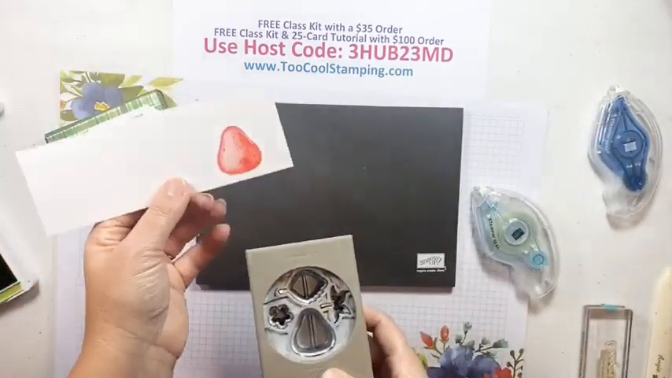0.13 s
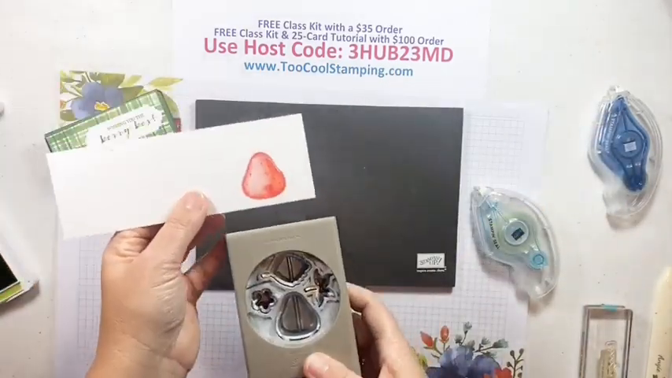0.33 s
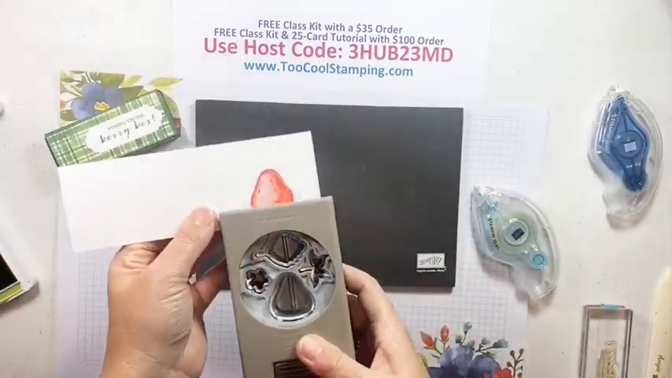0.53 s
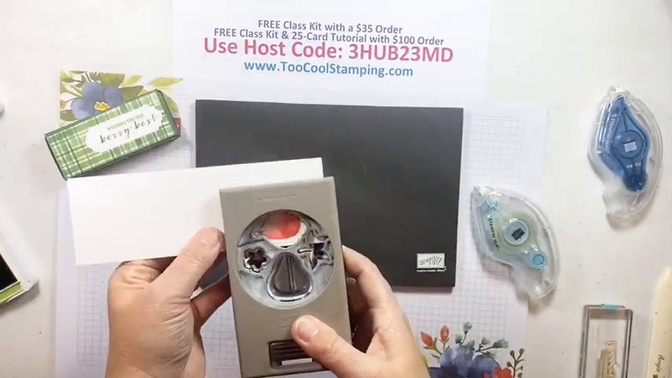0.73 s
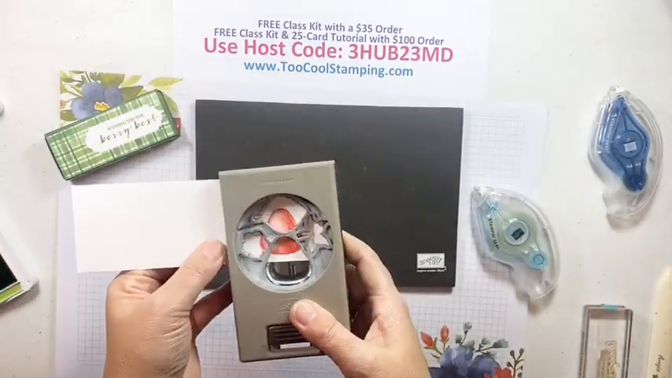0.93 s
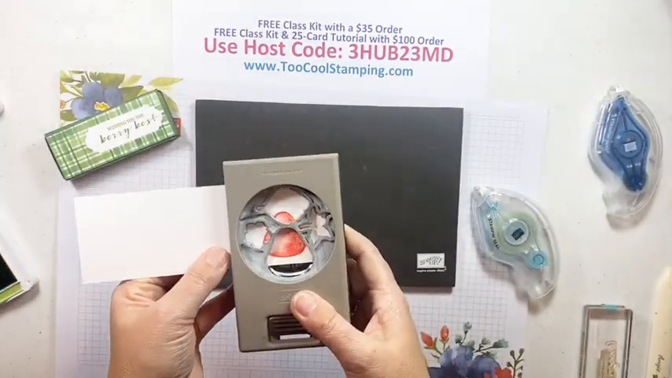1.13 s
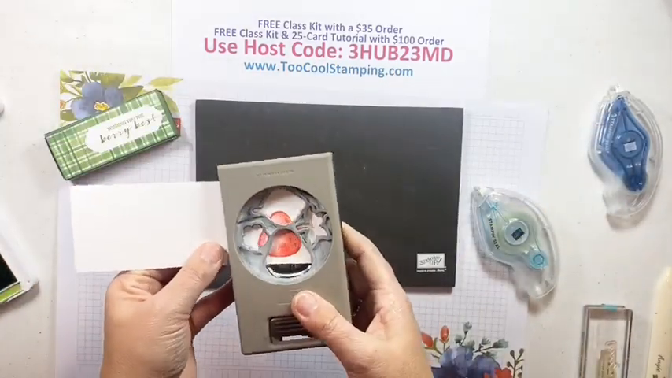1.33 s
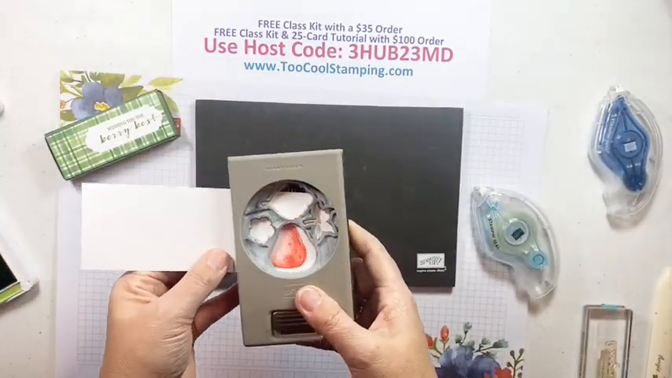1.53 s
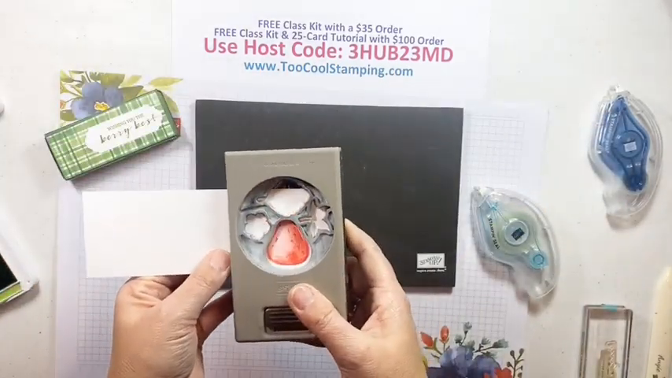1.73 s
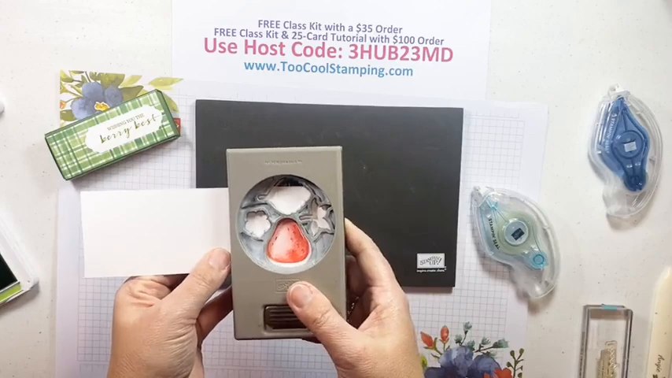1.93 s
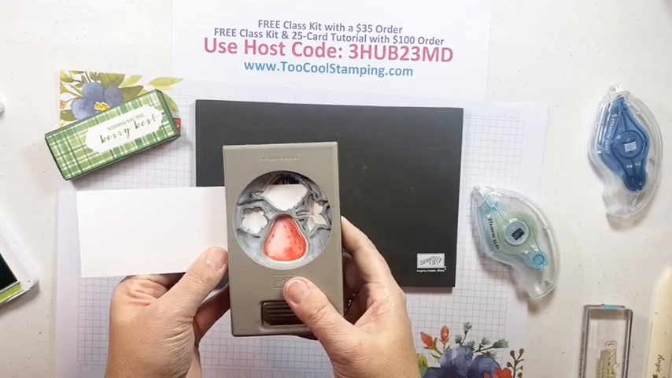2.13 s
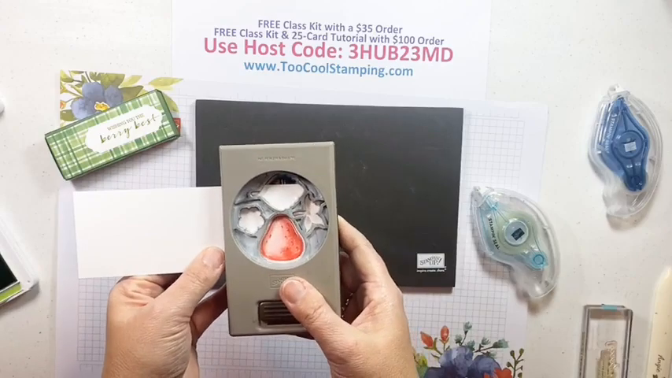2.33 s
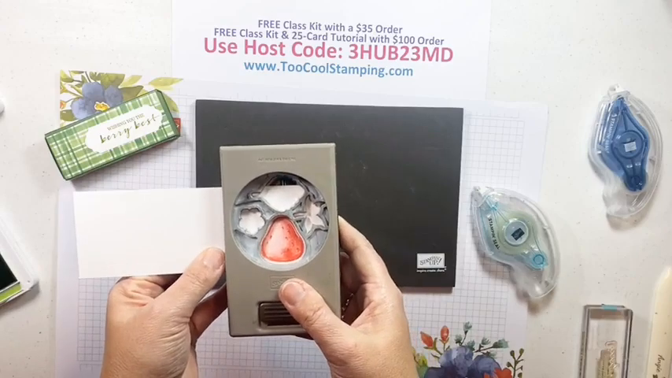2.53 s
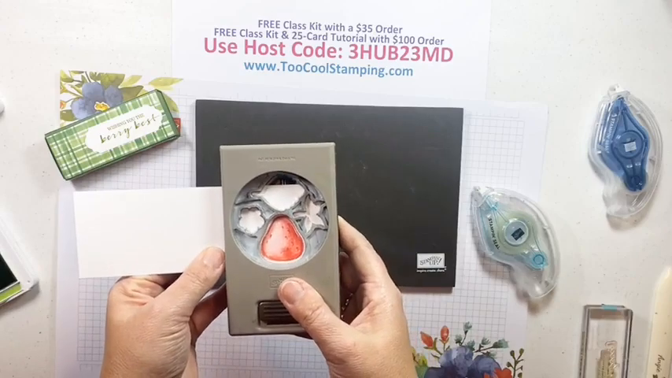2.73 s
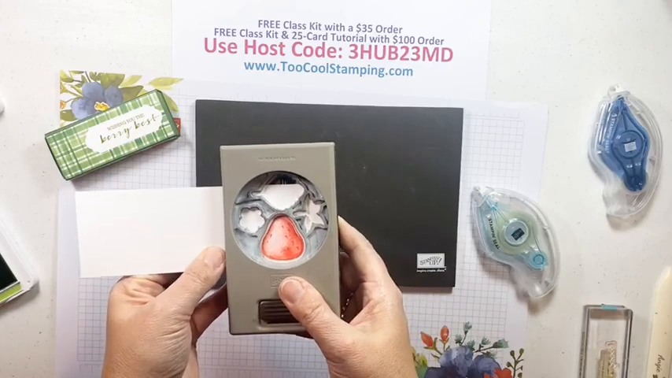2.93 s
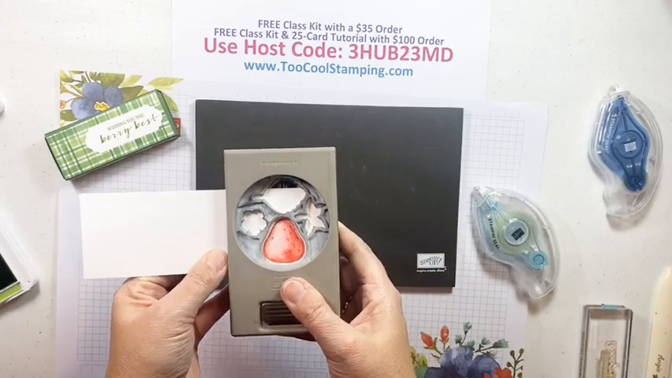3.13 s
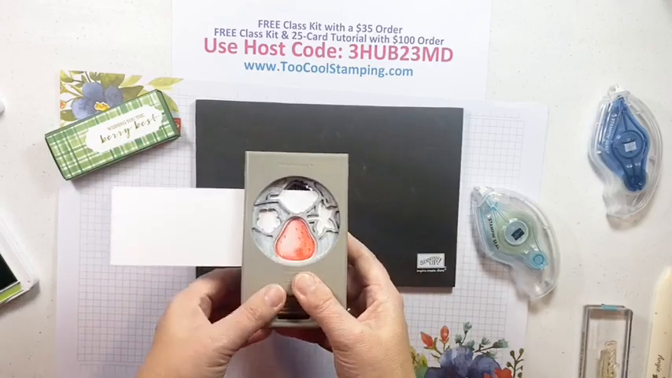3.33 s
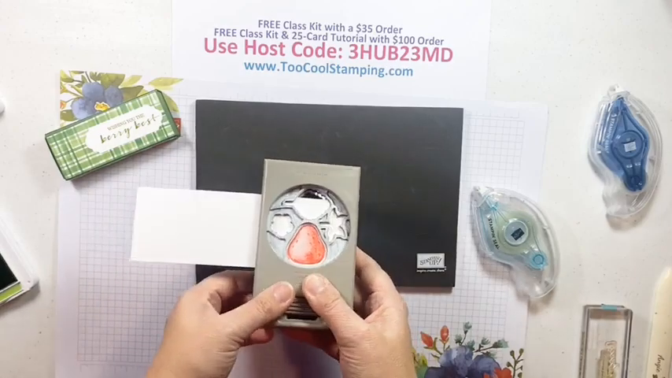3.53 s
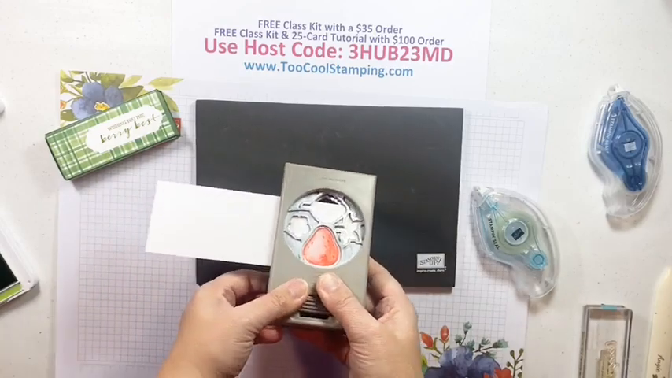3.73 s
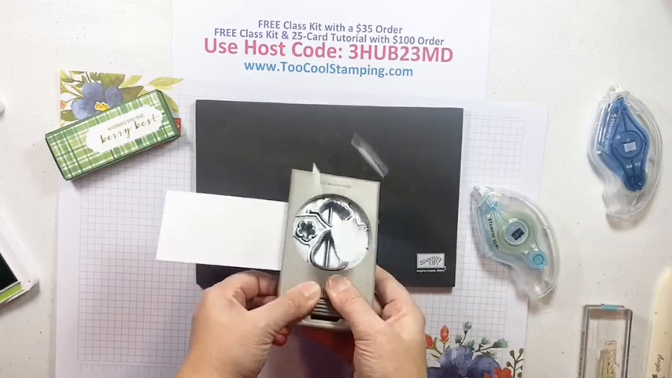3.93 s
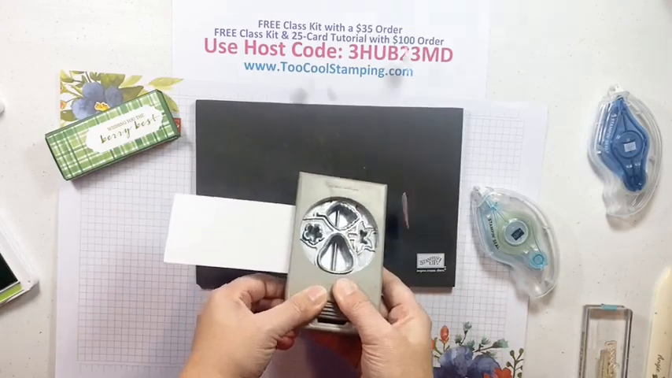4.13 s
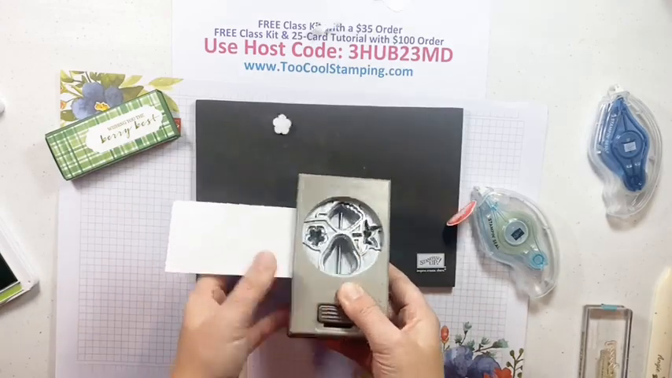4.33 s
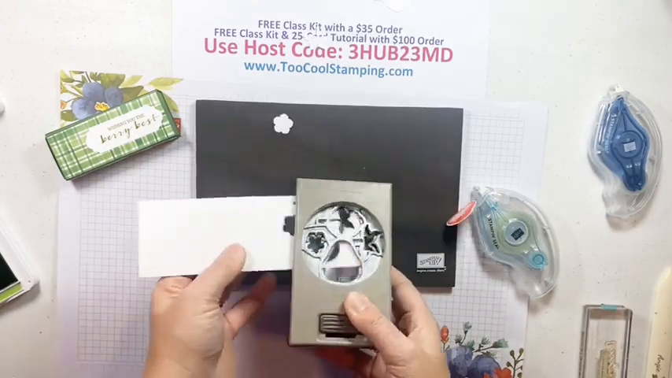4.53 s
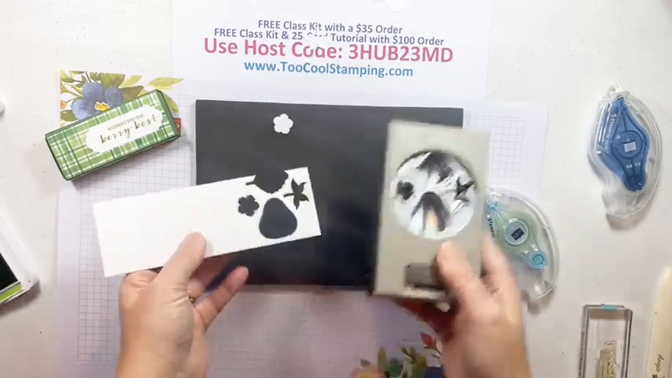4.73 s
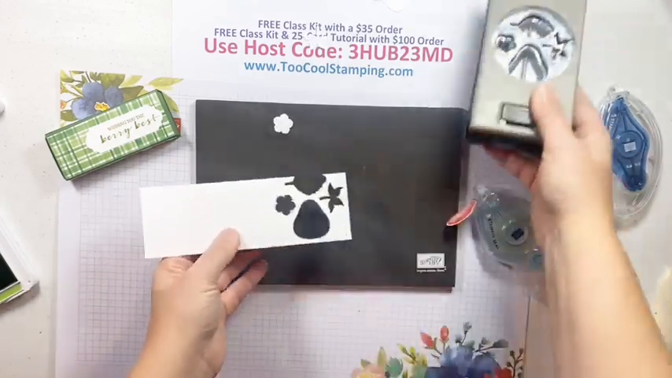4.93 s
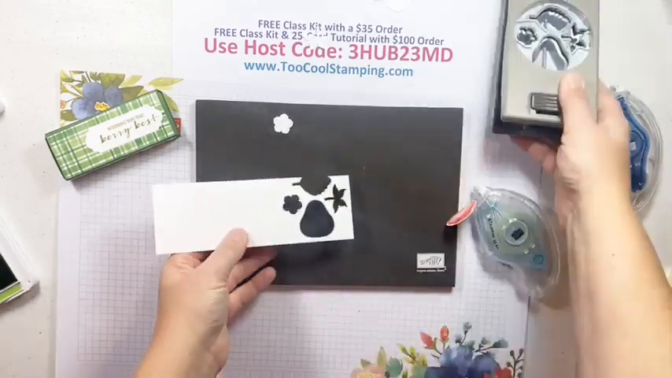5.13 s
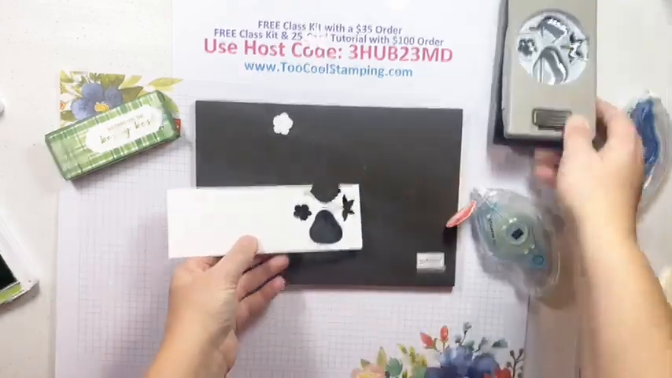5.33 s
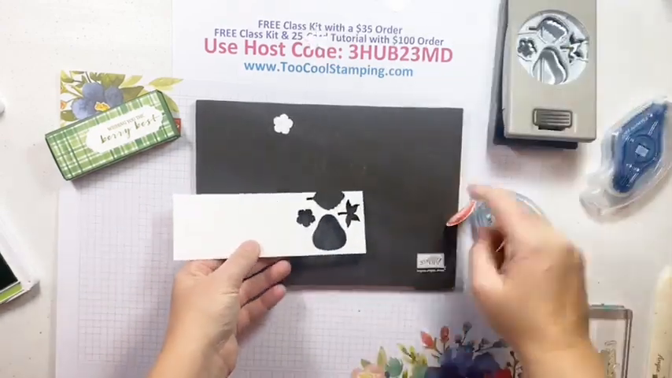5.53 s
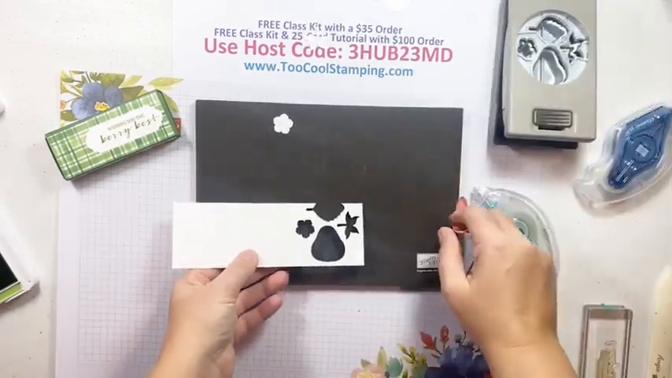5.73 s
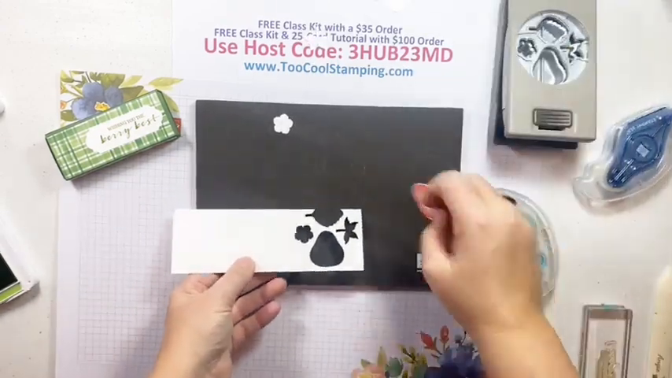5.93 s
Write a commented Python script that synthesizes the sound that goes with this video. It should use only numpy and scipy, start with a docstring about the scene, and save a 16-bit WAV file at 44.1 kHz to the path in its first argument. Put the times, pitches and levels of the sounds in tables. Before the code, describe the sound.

Card rustles faintly into a lever punch, which clacks through it, twangs and bumps down onto a table in a quiet room.

```python
"""At a craft table in a small room, a strip of card rubs its way into a hand-held lever punch.
The lever is squeezed: the steel cutters crunch through the card in stages and snap home, the frame
rings, and a twanging spring lifts them again. The card is drawn out, the punch lands on the table
in two bumps, rattling and skidding, and a fingertip drags a cut piece over the mat to pick it up.
One microphone overhead hears it all, along with the soft noise of the room's air."""
import sys
import numpy as np
from scipy import signal
from scipy.fft import rfft, irfft
from scipy.io import wavfile

SR = 44100
rng = np.random.default_rng(int(sys.argv[2]) if len(sys.argv) > 2 else 0)


def pcm_store(signal):
    """Save signal as 16-bit PCM."""
    levels = np.round(np.clip(np.atleast_2d(signal), -1, 1) * 32767)
    wavfile.write(sys.argv[1], SR, levels.astype(np.int16).T)


N = 267907
TIME = np.arange(N) / SR


def from_db(db):
    """Turn decibels into a number to multiply by."""
    return 10 ** (np.asarray(db) / 20)


def rms_one(x):
    """Scale a sound so that its average size (rms) is 1."""
    return x / np.sqrt(np.mean(x ** 2) + 1e-20)


def at_hz(points, hz):
    """Read between the rows of a table, giving every octave equal room."""
    f, value = np.transpose(points)
    return np.interp(np.log(np.maximum(hz, 1)), np.log(f), value)


def add(out, s, sound):
    """Mix a sound in, starting at s seconds."""
    start = int(s * SR)
    out[start:start + len(sound)] += sound[:len(out) - start]


def colour(x, tone):
    """Make each frequency louder or softer, following a tone table."""
    size = 8192
    gains = from_db(at_hz(tone, np.fft.rfftfreq(size, 1 / SR)))
    cepstrum = irfft(np.log(gains))
    cepstrum[1:size // 2] *= 2   # folded in half, so the filter never answers before the sound arrives
    cepstrum[size // 2 + 1:] = 0
    response = irfft(np.exp(rfft(cepstrum)))
    return signal.fftconvolve(x, response)[:len(x)]


def resonate(force, notes):
    """A shaken object rings at its own notes; the narrower a note's width, the longer it lasts."""
    out = np.zeros(len(force))
    for k, (hz, width, db) in enumerate(notes):
        r = np.exp(-np.pi * width / SR)   # how much ring is left after one sample
        angle = 2 * np.pi * hz / SR
        ring = signal.lfilter([1, 0, -1], [1, -2 * r * np.cos(angle), r * r], force + 1e-18)
        out += (-1) ** k * from_db(db) * (1 - r * r) / 2 * ring   # every other note is flipped
    return out


def burst(swell_s):
    """A short crackle that swells for swell_s seconds and dies, about equally strong at all pitches."""
    size = 4096
    age = np.arange(size) / SR / max(swell_s, 1 / SR)
    swell = (age * np.exp(1 - age)) ** 2
    noise = rng.standard_normal(size) * swell
    even_spectrum = np.exp(1j * np.angle(rfft(noise)))
    crackle = irfft(even_spectrum) * np.sqrt(swell)
    return crackle / np.linalg.norm(crackle)


def strike(hits, notes):
    """Sharp hits leave a part ringing."""
    s, db = np.transpose(hits)
    force = np.zeros(N)
    force[(s * SR).astype(int)] = from_db(db)
    return resonate(force, notes)


def pushes(starts, lengths, levels_db):
    """Each soft, heavy contact is one smooth pulse of force."""
    force = np.zeros(N)
    for s, length, db in zip(starts, lengths, levels_db):
        age = np.maximum(TIME - s, 0) * 4 / length
        pulse = age * np.exp(-age)
        force += from_db(db) * pulse / pulse.sum()
    return force


def friction(slips_per_s, spread_db):
    """Fibres catch and let go, making many tiny slips of uneven size."""
    sizes = from_db(spread_db * np.minimum(rng.exponential(1, N), 4))
    slipping = rng.random(N) < slips_per_s / SR
    return slipping * sizes * rng.standard_normal(N)


def strokes(starts, lengths, levels_db, rise_s=0.01, fade_s=0.032):
    """The loudness of sliding strokes: each one swells, holds and dies away."""
    power = np.zeros(N)
    age = TIME[:SR]
    rise = 1 - np.exp(-(age / rise_s) ** 2)
    for s, length, db in zip(starts, lengths, levels_db):
        fade = np.exp(-np.maximum(age - length, 0) / fade_s)
        add(power, s, (from_db(db) * rise * fade) ** 2)
    return np.sqrt(power)


def rub(slides, tone, slips_per_s):
    """One smooth surface slides over another and hisses."""
    slips = friction(slips_per_s, spread_db=1.5)
    return strokes(*np.transpose(slides)) * rms_one(colour(slips, tone))


# tone of the room's air: f/Hz, level/dB
AIR_TONE = [(15, -33), (25, -21), (49, -3.5), (87, -5), (166, -6), (212, -8), (301, -7), (405, -9.5),
            (1190, -18), (1290, -20.5), (1740, -21), (2110, -23.5), (2480, -23), (7710, -28),
            (16000, -44.5)]

def room_air():
    """The air in the room makes a faint, low, steady noise."""
    noise = colour(rng.standard_normal(N + SR), AIR_TONE)[SR:]
    return from_db(-67) * rms_one(noise)


# pushes that feed the card in: t/s, length/s, slot level/dB, rubbing level/dB
CARD_PUSHES = [(0.288, 0.031, -79, -80), (0.716, .09, -76, -78.5), (0.797, 0.094, -68.5, -58),
               (0.921, 0.16, -69, -67.5), (1.042, 0.028, -64.5, -84), (1.112, 0.047, -57, -82),
               (1.171, 0.042, -63, -79), (1.435, 0.034, -65.5, -81), (1.551, 0.095, -66, -79),
               (1.713, .12, -73.5, -85), (2.3, 0.024, -75, -81), (2.485, 0.039, -79, -89)]
# notes of the slot: f/Hz, width/Hz, level/dB
SLOT_NOTES = [(1397, 330, 10.5), (1470, 275, 10.5), (1595, 59, 10), (1630, 160, 5.5), (2820, 1060, -8)]
# tone of the rubbing card: f/Hz, level/dB
CARD_TONE = [(300, -16.5), (800, -4), (1500, -22), (1850, 1), (2000, 3), (2200, -4), (3200, -4.5),
             (3900, 1.5), (4400, 3.5), (5000, -6.5), (8000, -7), (10500, -24), (16000, -25)]

def feed_card():
    """The card rubs along the cutters and sets the narrow slot ringing."""
    s, length, slot_db, rub_db = np.transpose(CARD_PUSHES)
    slips = friction(slips_per_s=5000, spread_db=1.0)
    slot = strokes(s, length, slot_db) * rms_one(resonate(slips, SLOT_NOTES))
    rubbing = strokes(s, length, rub_db) * rms_one(colour(slips, CARD_TONE))
    return slot + rubbing


# clacks of the punch and the quick echoes that follow the loud ones:
# t/s, swell time/s, strength/dB, hardness/dB, casing boost/dB, cutter boost/dB
CLACKS_AND_ECHOES = [(1.616, 0.0012, -19.5, 2, 11, 0), (3.319, 0.0061, -27.5, -13.5, -3, 3.5),
                     (3.514, 0.0018, -29, -9, 9.5, -2), (3.596, 0.0019, -9, -1, 6, -3),
                     (3.6055, 0.00095, -4.5, -6.5, 7, -3), (3.632, 0.0035, -8, -0.5, 8, 0.5),
                     (3.676, .0014, -11, 1.5, 0, 5.5), (3.6845, 0.0014, -10.5, 1, 6.5, 5.5),
                     (3.824, 0.0072, -22.5, -1, 9.5, 0), (3.933, 0.0015, -4, -2.5, 9, 10),
                     (3.9412, 0.0015, -4.5, -3.5, 14, 6), (4.0405, 0.0018, 7.5, 5, -1, 3),
                     (4.049, 0.0089, 0, 5, -4.5, 6), (4.090, 0.0019, 9.5, 1.5, -2, -2.5),
                     (4.097, 0.0049, 4.5, 2, -2, 1), (4.298, 0.0076, -15.5, 8, -2, 2),
                     (4.335, 0.018, -12, 0, 2, 0), (4.433, 0.004, -22, 17, 6, -2),
                     (4.583, .011, -18.5, -8.5, -1, -5)]
# dull thud of the whole tool in the hands: f/Hz, width/Hz, level/dB
THUD_NOTES = [(149.5, 58, -3), (274, 42, -1), (385, 61, 1.5), (565, 79, 1)]
# notes of the hollow under the lever: f/Hz, width/Hz, level/dB
HOLLOW_NOTES = [(675, 62, -2), (732, 54, 0.5), (820, 53, 2), (1066, 134, 3.5)]
# bright crack of the card: f/Hz, width/Hz, level/dB
CRACK_NOTES = [(4465, 1600, -12), (6705, 810, 2), (7010, 600, 4), (8170, 1010, -1), (9000, 920, -2.5),
               (11500, 2100, -12.5), (14400, 2000, -17)]
# notes of the casing: f/Hz, width/Hz, level/dB
CASING_NOTES = [(1157, 69, -3.5), (1226, 82, 1.5), (1373, 124, 7), (1410, 154, 5.5), (1640, 83, -7),
                (1806, 190, -18.5), (2298, 186, -8)]
# notes of the steel cutters: f/Hz, width/Hz, level/dB
CUTTER_NOTES = [(2026, 190, -4.5), (2295, 91, -1), (2715, 206, -6), (3010, 51, -0.5), (3250, 584, -5),
                (4140, 190, -5.5), (4280, 160, -7), (4806, 100, -2.5), (5060, 400, -12)]

def punch_clacks(break_through_s=4.0):
    """The punch's parts ring: hard clacks crack, soft ones thud, and quick echoes follow loud ones."""
    out = np.zeros(N)
    for s, swell_s, strength_db, hardness_db, casing_db, cutter_db in CLACKS_AND_ECHOES:
        force = from_db(strength_db) * np.pad(burst(swell_s), (0, SR // 2))
        thud = from_db(-4.5 - 0.95 * hardness_db) * resonate(force, THUD_NOTES)
        hollow = from_db(0.28 - 0.1 * hardness_db) * resonate(force, HOLLOW_NOTES)
        crack = from_db(-7 + 0.96 * hardness_db) * resonate(force, CRACK_NOTES)
        casing = from_db(2.5 + casing_db) * resonate(force, CASING_NOTES)
        cutters = from_db(3 + 0.55 * hardness_db + cutter_db) * resonate(force, CUTTER_NOTES)
        clack = thud + hollow + crack + casing + cutters
        # the card closes the punch; once it is cut through, more sound fills the room
        tail_db = -34.5 if s < break_through_s else -29.5
        add(out, s, room(clack, tail_db))   # the tool shifts in the hands, so the room's answer varies
    return out


# the cutters snap home: t/s, level/dB
SNAPS = [(4.043, 15), (4.094, 17)]
# notes of the metal frame: f/Hz, width/Hz, level/dB
FRAME_NOTES = [(786, 12.36, -5.5), (1016, 18, 3.5), (1106, 37, 3.5), (1300, 7.9, -7), (1427, 19, -3),
               (1829, 21.8, 7), (2040, 12, -4.5), (2180, 8.8, -3.5), (2330, 8.6, -0.5), (2670, 16, 1.5),
               (2840, 30, 1.5), (2960, 22, 0.5), (3170, 22, -1.5), (3270, 24, -2), (5170, 11, -5.5),
               (5552, 11, -6.5)]

def snap_home():
    """The cutters snap home and the metal frame rings on."""
    return strike(SNAPS, FRAME_NOTES)


# twangs of the spring: t/s, level/dB
TWANGS = [(4.304, -5.5), (4.348, 0), (4.437, -5.5)]
# notes of the spring: f/Hz, width/Hz, level/dB
SPRING_NOTES = [(278.6, 6.3, 6.5), (575, 7, 5), (1060, 31, -5)]

def spring_twang():
    """The spring twangs as it lifts the cutters again."""
    return strike(TWANGS, SPRING_NOTES)


# tugs on the card: t/s, length/s, level/dB
TUGS = [(4.44, 0.069, -60), (4.525, 0.077, -63), (4.67, 0.063, -63), (4.78, 0.02, -63)]
# tone of the tugs: f/Hz, level/dB
TUG_TONE = [(180, -42), (300, -1), (392, 3), (447, -21), (565, -5), (1060, -2.5), (1150, -6), (1250, -1),
            (3460, -6.5), (7320, -8), (16000, -20)]

def draw_card_out():
    """The card rubs against the punch as it is tugged out."""
    return rub(TUGS, TUG_TONE, slips_per_s=4700)


# the punch meets the table: t/s, contact time/s, thump level/dB, drone level/dB, rattle level/dB
BUMPS = [(5.2119, 0.0017, 3, -8, -8.5), (5.217, 0.0037, 22, 19.5, -0.5), (5.230, 0.0079, 14, 23, -11.5),
         (5.442, 0.004, 29.5, 4, -2.5), (5.450, 0.0049, 35, 33, 3), (5.470, 0.0036, 8, 40.5, 3.5),
         (5.496, 0.007, 26.5, 34, -3)]
# the table top's short thump: f/Hz, width/Hz, level/dB
THUMP_NOTES = [(59, 5.6, 1.5), (96.4, 6.8, 8.5), (143.6, 16, 5), (192, 21, 1.5), (295, 39, -1.5),
               (389, 76, -7.5), (620, 250, -18)]
# the table top's lingering drone: f/Hz, width/Hz, level/dB
DRONE_NOTES = [(81, 6.8, 0), (117.3, 5.14, 3.5), (178.7, 6.9, 0), (230, 4.5, -4.5), (283.3, 6.9, 8.5),
               (398.3, 8.7, -3), (563, 6.8, 7)]
# tone of the punch's loose parts: f/Hz, level/dB
RATTLE_TONE = [(60, -31.5), (150, 11.5), (400, 5.5), (600, 1), (1150, -2), (1800, -7), (2500, -4),
               (3300, -12.5), (5000, -16), (8000, -27.5), (10000, -30.5), (12000, -52), (16000, -50)]

def set_down():
    """The table top thumps and drones under the weight while the punch's loose parts rattle."""
    starts, lengths, thump_db, drone_db, rattle_db = np.transpose(BUMPS)
    thump = resonate(pushes(starts, lengths, thump_db), THUMP_NOTES)
    drone = resonate(pushes(starts, lengths, drone_db), DRONE_NOTES)
    rattle = np.zeros(N)
    for s, swell_s, db in zip(starts, lengths, rattle_db):
        force = from_db(db) * np.pad(burst(swell_s), (0, SR // 2))
        add(rattle, s, room(colour(force, RATTLE_TONE), tail_db=-29.5))
    return thump + drone + rattle


# skids of the punch: t/s, length/s, level/dB
SKIDS = [(5.355, 0.064, -56), (5.44, 0.077, -45), (5.56, 0.382, -70)]
# tone of the skids: f/Hz, level/dB
SKID_TONE = [(300, 6.5), (700, -6), (1100, -3), (1800, -9), (2500, -10.5), (3300, -13.5), (6000, -23.5),
             (14000, -37)]

def punch_skid():
    """The punch scrapes over the table top as it settles."""
    return rub(SKIDS, SKID_TONE, slips_per_s=3000)


# drags of the cut piece: t/s, length/s, level/dB
DRAGS = [(6.002, 0.061, -55.5), (6.048, .04, -54)]
# tone of the drags: f/Hz, level/dB
DRAG_TONE = [(1000, -20.5), (2550, -25), (3000, -12.5), (3400, -25), (4350, -6.5), (4700, -17), (5200, -3),
             (6100, -17.5), (7500, -19), (9500, -23), (13000, -39), (16000, -44)]

def pick_up_piece():
    """A fingertip drags a cut piece of card over the mat."""
    return rub(DRAGS, DRAG_TONE, slips_per_s=4000)


# bounces between the table and a nearby surface: delay/s, gain
ECHOES = [(.0074, 0.66), (0.0168, .42)]
# the room's fading tail of sound: f/Hz, fade time/s (to fall 60 dB), level/dB
ROOM_TAIL = [(70, 0.86, -1.5), (304, 0.35, -1), (900, 0.34, 2), (1490, 0.34, 0.5), (2980, 0.3, 3.5),
             (7300, 0.24, 4), (14000, 0.18, 3)]

def room(x, tail_db, scatter_s=0.00066, build_s=0.0026):
    """Sound arrives directly, then as slightly smeared echoes and a tail whose highs die first."""
    size = 24576
    t, hz = TIME[:size], np.fft.rfftfreq(size, 1 / SR)
    centres, fade_times, levels_db = np.transpose(ROOM_TAIL)
    noise_spectrum = rfft(rng.standard_normal(size))
    response = np.zeros(size)
    for fade_s, db, share in zip(fade_times, levels_db, np.eye(len(ROOM_TAIL))):
        band = irfft(noise_spectrum * at_hz(np.c_[centres, share], hz))
        response += band * from_db(tail_db + db) * np.exp(-np.log(1000) * t / fade_s)
    response *= 1 - np.exp(-(t / build_s) ** 2)
    response[0] += 1   # the direct sound
    for delay, gain in ECHOES:
        add(response, delay, gain * burst(scatter_s))
    return signal.fftconvolve(x, response)[:len(x)]


def scene():
    """All the handling sounds over the room's steady air, in one channel."""
    rubbing = feed_card() + draw_card_out() + punch_skid() + pick_up_piece()
    air = room_air()
    punch = punch_clacks() + snap_home() + spring_twang()
    return (punch + set_down() + room(rubbing, tail_db=-31.5) + air)[None]


def record(dry, low_hz=42, high_hz=15850):
    """The microphone loses the deepest bass, and the highest treble is cut off."""
    bass_cut = signal.butter(4, low_hz, "high", fs=SR, output="sos")
    treble_cut = signal.ellip(10, .1, 80, high_hz, fs=SR, output="sos")
    return signal.sosfilt(treble_cut, signal.sosfilt(bass_cut, dry))


dry = scene()
out = record(dry)
pcm_store(out)
```